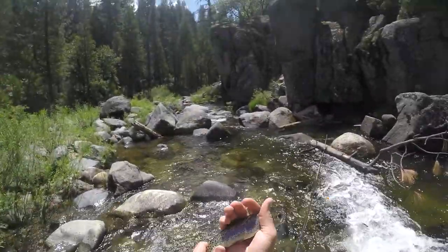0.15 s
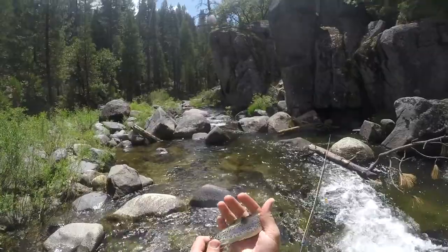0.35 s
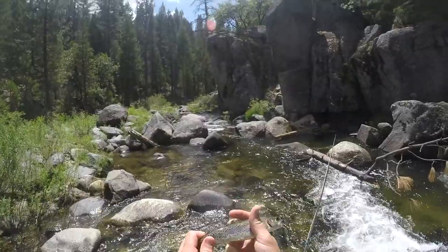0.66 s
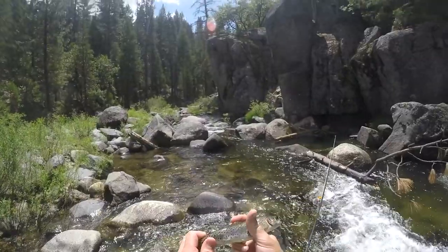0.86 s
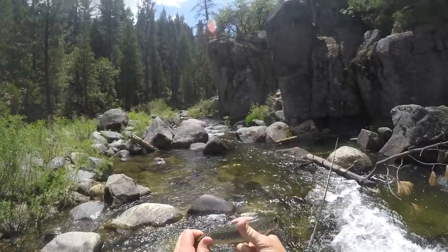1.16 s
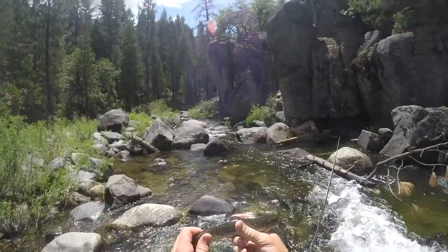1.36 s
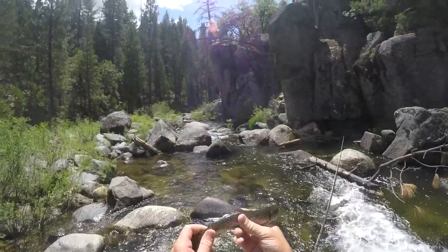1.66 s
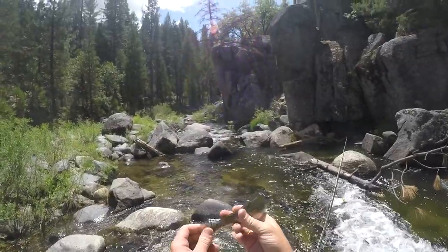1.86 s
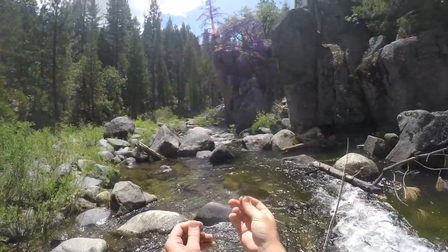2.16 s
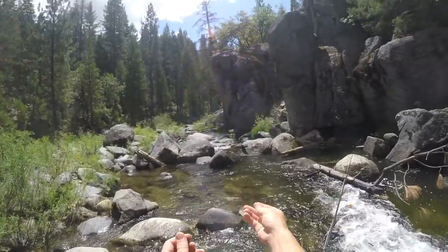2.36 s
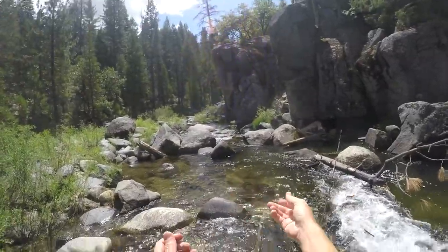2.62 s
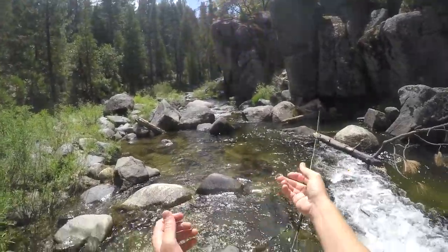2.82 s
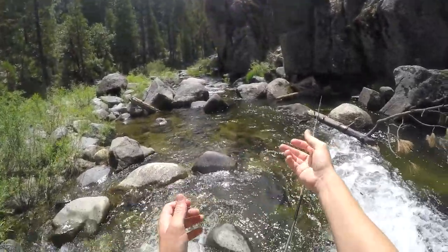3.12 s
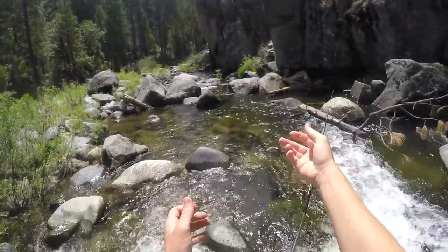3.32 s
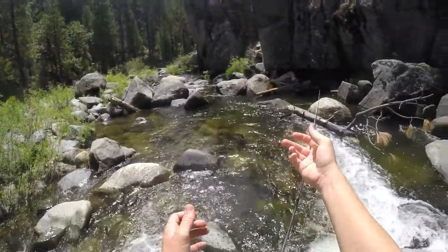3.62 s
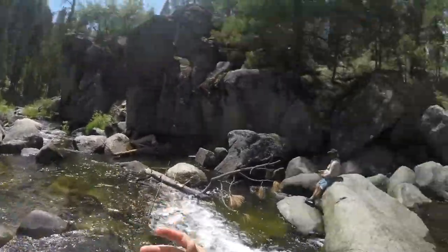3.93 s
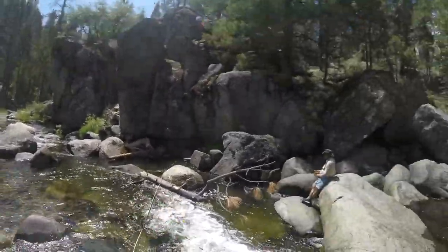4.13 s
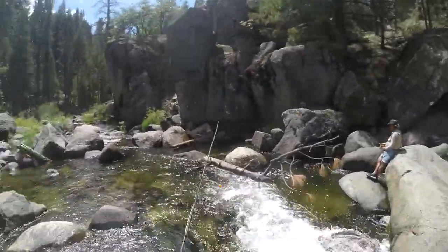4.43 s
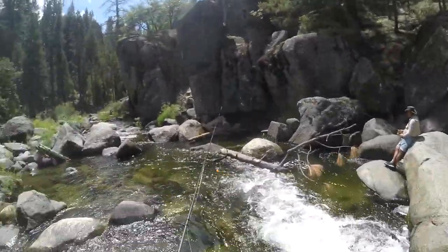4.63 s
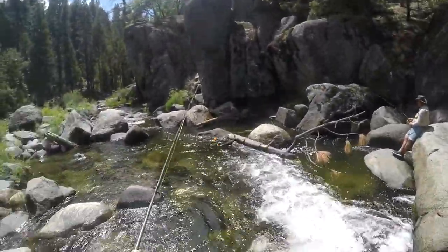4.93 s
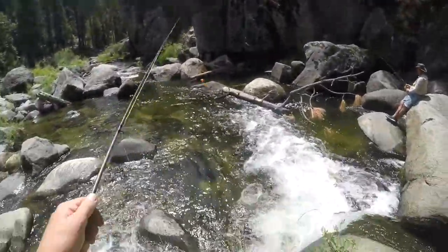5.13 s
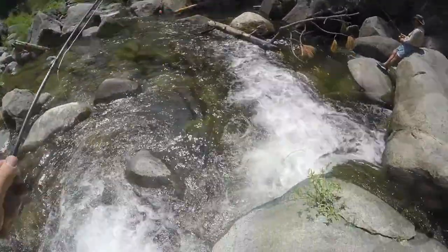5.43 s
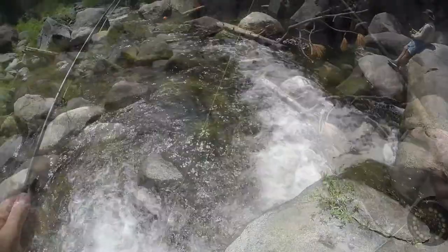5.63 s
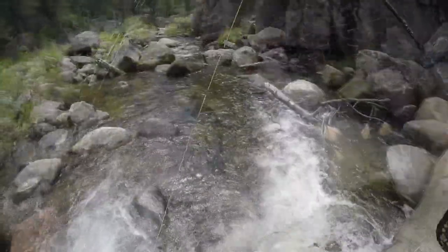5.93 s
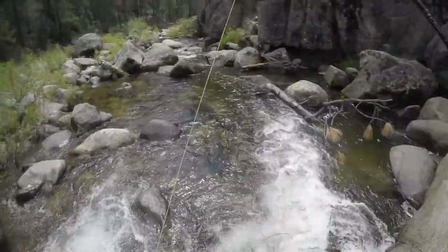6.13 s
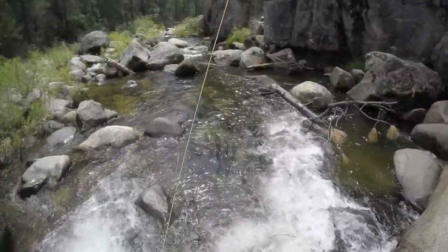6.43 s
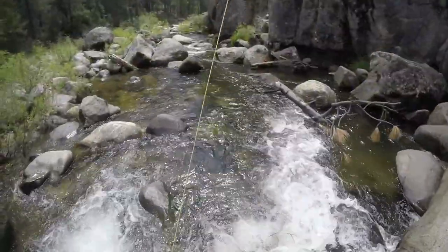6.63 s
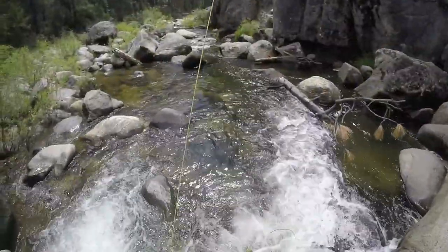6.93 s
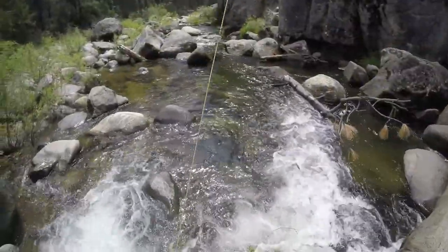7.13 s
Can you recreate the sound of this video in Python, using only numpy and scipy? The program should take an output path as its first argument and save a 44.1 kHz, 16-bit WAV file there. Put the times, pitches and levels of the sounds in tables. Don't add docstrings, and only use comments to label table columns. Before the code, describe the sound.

Outdoors at a rocky creek, a body-worn camera in a closed housing catches a loud, boomy cascade with bubbling and spray. Within a second it drops to a darker, slower half-speed roar, dotted with plops. Just after three seconds it snaps back to normal pitch with a splash and deep gulps, eases slightly, then melts into a much quieter, thinner rush.

```python
import sys
import numpy as np
from scipy import signal
from scipy.fft import rfft, irfft, next_fast_len
from scipy.io import wavfile
from scipy.ndimage import uniform_filter1d

SR = 44100
rng = np.random.default_rng(int(sys.argv[2]) if len(sys.argv) > 2 else 0)


def field_ratio(decibels):
    return 10 ** (np.asarray(decibels, dtype=float) / 20)


def pcm_store(signal):
    levels = np.round(np.clip(np.atleast_2d(signal), -1, 1) * 32767)
    wavfile.write(sys.argv[1], SR, levels.astype(np.int16).T)


N = 320607
EDGE_HZ = 15200


def water(size):
    plunge = wash(size, patchy_db=0.53, flicker_db=0.04)
    gusts = wash(size, patchy_db=0.7, flicker_db=0.7)
    near_bubbles = swarm(size, 378, 3300, per_s=2000, cycles=4.83, spread_db=-1.5)
    near_spray = swarm(size, 3450, 14700, per_s=2500, cycles=9.8, spread_db=5.0)
    return plunge, gusts + 0.34 * near_bubbles, fluttered(gusts + 0.33 * near_spray)


def wash(size, patchy_db, flicker_db):
    frames = size // 128 + 5
    real, imaginary, patches = rng.standard_normal((frames, 257, 3)).T
    patches = uniform_filter1d(patches, size=7, axis=0)
    patches = evened(uniform_filter1d(patches, size=16, axis=1))
    flicker = evened(uniform_filter1d(rng.standard_normal(frames), size=5))
    spectra = (real + 1j * imaginary) * field_ratio(patchy_db * patches + flicker_db * flicker)
    return evened(signal.istft(spectra, nperseg=512, noverlap=384)[1][:size])


def swarm(size, lo_hz, hi_hz, per_s, cycles, spread_db):
    chance, kind, big = rng.random(size), rng.integers(0, 24, size), rng.exponential(1, size)
    bursts = field_ratio(spread_db * np.minimum(big, 4)) * (chance < per_s / SR)
    out = np.zeros(size)
    for k, hz in enumerate(np.geomspace(lo_hz, hi_hz, 24)):
        ring = bubble(hz, cycles, rise=0.11)
        out += hz * signal.oaconvolve(bursts * (kind == k), ring)[:size]
    return evened(out)


def bubble(hz, cycles, rise):
    samples = int(4 * cycles / hz * SR) + 8
    age = np.arange(samples) * hz / SR / cycles
    ring = np.sin(2 * np.pi * cycles * (age + rise * age ** 2 / 2))
    return ring * (1 - np.exp(-8 * age)) * np.exp(-2 * age)


def flow_db(t):
    # start_s, lift_db, length_s
    surges = [(0.0, 1.5, 0.1), (0.563, 1.5, 0.13), (1.24, 1, .08), (1.38, -3, 0.058), (1.66, -0.5, .05),
              (2.04, 0.5, 0.052), (3.002, -2, 0.084), (3.292, 4, .04), (3.348, 4.5, 0.011),
              (3.47, 1.5, 0.034), (4.27, 0, .1), (4.52, -1.5, .04), (4.585, 3, .04), (6.0, 0, 0.053),
              (3.5, 0.5, 0.24), (5.7, 0.3, 0.14), (7.262, 1, .03)]
    # centre_s, lift_db, length_s
    heaves = [(0.22, 3, 0.12), (0.633, 1, .04), (1.2, -1.5, 0.087), (1.5, 1, 0.24), (1.856, -0.5, 0.11),
              (2.302, 1, 0.29), (2.9, 1.5, .08), (3.2, 2, 0.036), (3.322, 0.5, 0.066), (3.424, -4, 0.028),
              (3.555, -3, 0.035), (4.7, 1.5, 0.077), (5.05, -1, 0.12), (5.797, -1.5, 0.069),
              (6.51, 0, 0.12), (7.09, -3.5, 0.08)]
    rise_s = 0.0073
    surge, heave = np.zeros(len(t)), np.zeros(len(t))
    for s, db, length in surges:
        arrival = np.clip((t - s) / rise_s + 1, 0, 1)
        surge += db * arrival * np.exp(-np.maximum(t - s, 0) / length)
    for s, db, length in heaves:
        heave += db * np.exp(-((t - s) / length) ** 2)
    return heave, surge, surge


def drops():
    # start_s, peak_db, pitch_hz, ring_cycles
    plops = [(0.1894, -31, 1820, 3.3), (0.4494, -35, 1730, 8), (0.5721, -28.5, 1860, 7.3),
             (0.6055, -27.5, 1850, 10), (1.153, -33, 1060, 4.6), (1.214, -38.5, 306, 9.1),
             (1.243, -30.5, 1065, 7.2), (1.274, -29.5, 520, 5.2), (1.355, -30.5, 900, 3),
             (1.3583, -41, 2400, 8), (1.547, -35, 520, 8.6), (1.679, -28, 1010, 4.2),
             (2.899, -38, 483, 6.4), (3.476, -20.5, 382, 3.7), (3.492, -19, 214, 1.9),
             (3.484, -33, 1020, 6.5), (3.6591, -35, 1750, 6.4), (3.663, -30, 382, 2.3),
             (3.706, -37, 1870, 6), (3.9609, -37, 2210, 7.4), (6.2806, -43, 1950, 9.9),
             (6.56, -44, 1930, 7.1), (7.0304, -52, 2090, 8)]
    # start_s, peak_db, centre_hz, length_s
    ticks = [
        (0.5724, -32, 5850, 0.002),
        (3.2834, -37, 9000, 0.001),
        (3.343, -44, 6000, 0.0017),
        (3.353, -28.5, 5900, 0.0022),
        (3.462, -47.5, 5970, 0.002),
        (4.595, -44, 6000, 0.002),
        (5.5774, -39, 6000, 0.00068),
        (3.351, -50.5, 24200, 0.0007),
        (7.2665, -51, 25700, 0.00051),
    ]
    out = np.zeros(N)
    for s, db, hz, cycles in plops:
        add(out, s, 2 * field_ratio(db) * bubble(hz, cycles, rise=0.036))
    t = np.arange(1500) / SR
    for s, db, hz, length in ticks:
        burst = rng.standard_normal(len(t)) * t / length * np.exp(1 - t / length)
        band = signal.butter(1, [hz * 0.37, min(hz * 0.67, 20000)], "band", fs=SR)
        add(out, s, 0.5 * field_ratio(db) * signal.lfilter(*band, burst))
    return out


def coloured(x, points, speed):
    # centre_hz, width_hz, lift_db
    cavities = [(5400, 260, 1.5), (6830, 320, 1), (7900, 250, -2.5), (8460, 320, 1.5), (10300, 400, 0.5),
                (13300, 500, 3.5)]
    point_hz, point_db = np.transpose(points)
    hz = np.fft.rfftfreq(len(x), 1 / SR)
    level_db = np.interp(np.log(hz / speed + 1), np.log(point_hz + 1), point_db, -120, -120)
    for centre_hz, width_hz, lift_db in cavities:
        level_db += lift_db * np.exp(-((hz - centre_hz) / width_hz) ** 2)
    return evened(irfft(rfft(x) * field_ratio(level_db) * (hz < EDGE_HZ), len(x)))


def fluttered(x):
    from_hz, share = 14400, 0.28
    hz, t, spectra = signal.stft(x, SR, nperseg=1024)
    chance = rng.random((len(t) // 2 + 1, 65))
    chance = np.repeat(chance, 2, axis=0).repeat(8, axis=1)[:len(t), :len(hz)].T
    lost = chance < share * 2 * ((hz - from_hz) / (EDGE_HZ - from_hz))[:, None]
    return signal.istft(spectra * ~lost, SR, nperseg=1024)[1][:len(x)]


def stretch_of_creek(from_s, to_s, views, levels_db, tuned_down=1, stretch=1):
    # reached_s, view_number
    turns = [
        (4.1, 0),
        (4.4, 1),
        (4.85, 1),
        (5.2, 2),
        (5.53, 2),
        (6.01, 3),
    ]
    start = max(round((from_s - 0.05) * SR), 0)
    stop = min(round((to_s + 0.05) * SR), N)
    t, out = np.arange(start, stop) / SR, np.zeros(N)
    facing = np.minimum(np.interp(t, *np.transpose(turns)), len(views) - 1)
    voices = water(next_fast_len(len(t) // stretch + 1))
    lifts_db = flow_db(t)
    for k, view in enumerate(views):
        share = np.maximum(1 - abs(facing - k), 0)
        for voice, colour, level_db, lift_db in zip(voices, view, levels_db[k], lifts_db):
            heard = coloured(voice, colour, tuned_down)
            heard = signal.resample(heard, len(voice) * stretch)[:len(t)]
            out[start:stop] += share * heard * field_ratio(level_db + lift_db)
    return out


def evened(x):
    return x / np.sqrt(np.mean(x ** 2) + 1e-20)


def add(mix, s, sound):
    part = mix[round(s * SR):][:len(sound)]
    part += sound[:len(part)]


def scene():
    # pitch_hz, level_db_per_hz
    plunge_slow = [(8.8, -35.5), (15, -1.5), (77, -1), (139, -8), (180, -14.5), (280, -29.5), (360, -72.5),
                   (620, -120)]
    bubbles_slow = [(150, -33), (250, -9), (280, -11.5), (311, -1.5), (346, -6.5), (520, -2.5), (597, -10),
                    (709, -4), (807, -6), (927, -1), (1040, -6), (1130, -2), (1250, -9.5), (1440, -10.5),
                    (1750, -35), (2280, -52.5), (3850, -120)]
    spray_slow = [(970, -21.5), (1650, -4), (1740, -8.5), (1960, 1), (2160, -2.5), (2480, -3.5), (2680, -1),
                  (3110, -11), (3420, -9.5), (3910, -12), (4250, -11), (5210, -20.5), (5660, -17),
                  (6690, -21), (7600, -23.5), (9880, -70.5), (16700, -120)]
    # pitch_hz, level_db_per_hz
    plunge_turned = [(7.1, -46), (12, -20), (54, 5), (128, 3), (267, -1), (413, -13), (560, -26),
                     (730, -72), (1230, -120)]
    bubbles_turned = [(290, -25), (500, -17), (565, -4.5), (628, 2.5), (704, -4.5), (1050, 1.5),
                      (1210, -8.5), (1430, -2), (1580, -4.5), (1840, 0.5), (2050, -4.5), (2220, -1),
                      (2550, -8.5), (2900, -9), (3500, -25), (4550, -45), (7700, -120)]
    # pitch_hz, level_db_per_hz
    spray_down = [(1940, -29), (3300, -9), (3470, 0), (3940, 4.5), (4530, -0.5), (5280, -2), (7880, -6),
                  (8670, -6), (10700, -13.5), (13600, -17), (15100, -30)]
    spray_cliff = [(1940, -16), (3300, -9), (3520, -13), (3940, -3.5), (4890, -6), (5310, -4), (6150, -9.5),
                   (6940, -9), (7980, -10), (8780, -9.5), (10600, -17.5), (13400, -20), (15100, -27)]
    spray_turned = [(1940, -28), (3300, -12), (3450, -10), (3940, 1.5), (4560, -5), (5490, -9), (6110, -6),
                    (7350, -7), (7980, -10), (8890, -11), (10600, -20), (13500, -21), (15100, -29)]
    # pitch_hz, level_db_per_hz
    plunge_last = [(7.1, -49), (12, -19), (69, -1), (170, -3), (210, -6), (263, -7), (280, -11),
                   (329, -14.5), (508, -25.5), (560, -34), (730, -65), (1230, -120)]
    bubbles_last = [(290, -43), (500, -21), (603, -10), (789, -15), (959, -12.5), (1030, -5.5), (1100, -12),
                    (1170, -20), (1540, -14), (1680, -12.5), (1780, -8.5), (2060, -10), (2220, -13.5),
                    (2830, -17), (3500, -33), (4550, -62), (7700, -120)]
    spray_last = [(1940, -36), (3300, -17), (3650, -6.5), (4600, -4.5), (4880, -7), (5300, -5.5),
                  (6650, -8), (8280, -9.5), (9000, -9.5), (10000, -16), (11200, -19), (12600, -20),
                  (13400, -22), (14100, -23), (15100, -36)]
    # plunge_db, bubbles_db, spray_db
    opening_db = [
        (-20, -35.5, -48.5),
    ]
    slowed_db = [
        (-25, -41, -53.5),
    ]
    turning_db = [
        (-28.5, -46, -60.5),
        (-29, -45.5, -60.5),
        (-29, -45, -57),
        (-40.5, -55.7, -70),
    ]

    slow_from_s, slow_to_s = 0.692, 3.282
    fade_s, splice_s = 0.018, 0.004
    t = np.arange(N) / SR
    into_slow = np.clip((t - slow_from_s) / fade_s + 1, 0, 1)
    out_of_slow = np.clip((t - slow_to_s) / splice_s + 0.5, 0, 1)
    upstream = [(plunge_slow, bubbles_slow, spray_slow)]
    turning = [(plunge_turned, bubbles_turned, spray) for spray in (spray_down, spray_cliff, spray_turned)]
    turning.append((plunge_last, bubbles_last, spray_last))

    opening = stretch_of_creek(0, slow_from_s, upstream, opening_db, tuned_down=2.005)
    slowed = stretch_of_creek(slow_from_s, slow_to_s, upstream, slowed_db, tuned_down=1.991, stretch=2)
    turned = stretch_of_creek(slow_to_s, N / SR, turning, turning_db)
    mix = (1 - into_slow) * opening
    mix += into_slow * (1 - out_of_slow) * slowed
    mix += out_of_slow * turned
    return (mix + drops())[None]


def band_limit(x):
    return signal.sosfilt(signal.butter(12, 15210, fs=SR, output="sos"), x)


def record(dry):
    hiss = field_ratio(-104) * rng.standard_normal(dry.shape)
    return band_limit(dry + hiss)


dry = scene()
out = record(dry)
pcm_store(out)
```